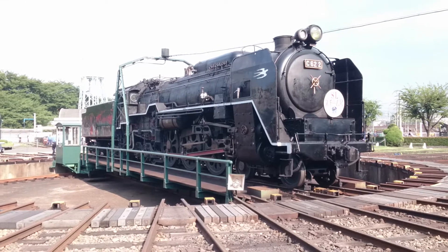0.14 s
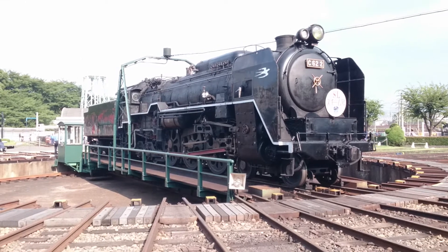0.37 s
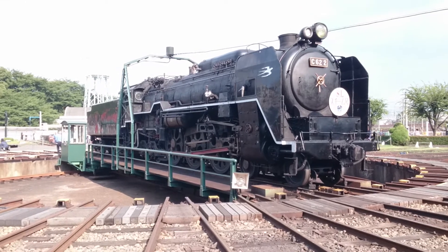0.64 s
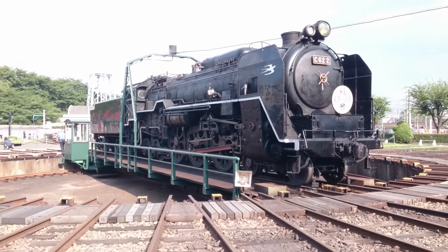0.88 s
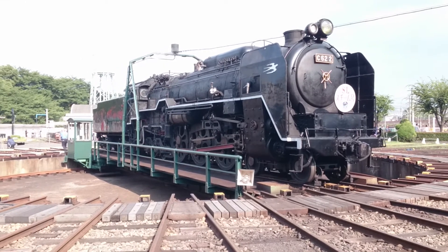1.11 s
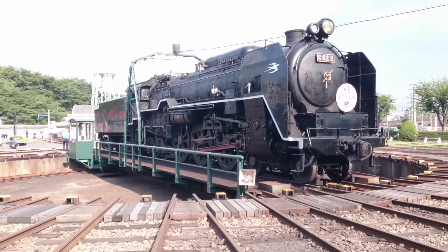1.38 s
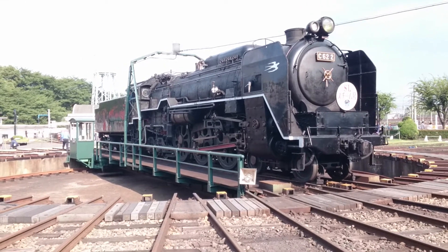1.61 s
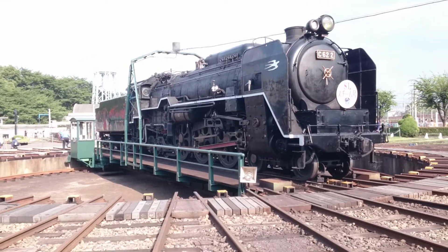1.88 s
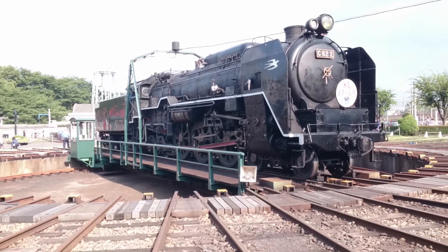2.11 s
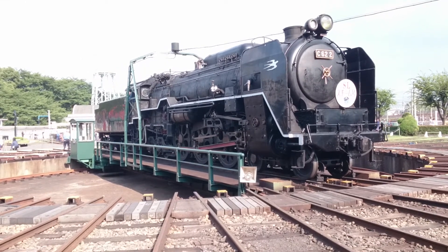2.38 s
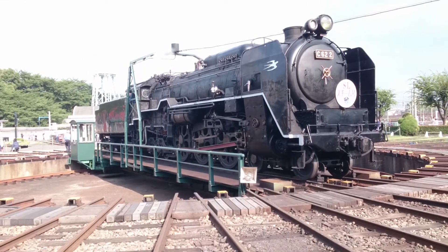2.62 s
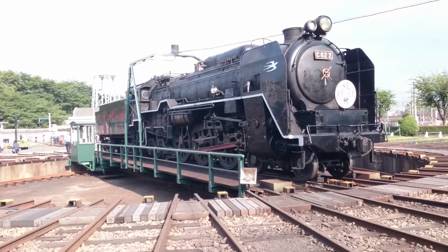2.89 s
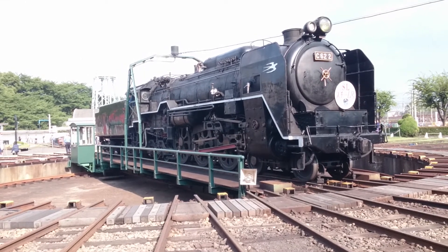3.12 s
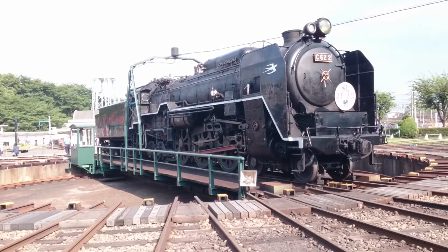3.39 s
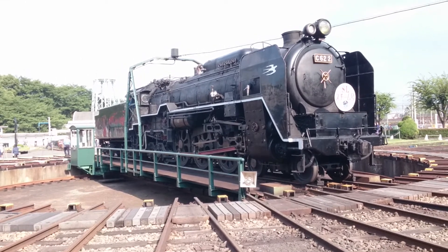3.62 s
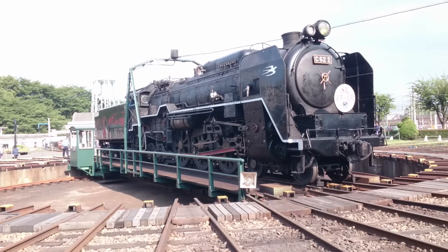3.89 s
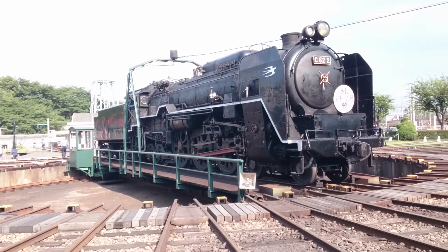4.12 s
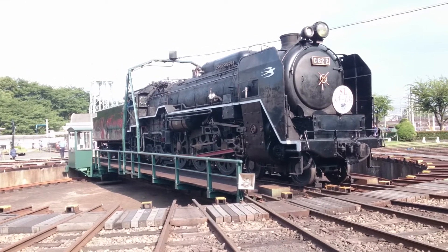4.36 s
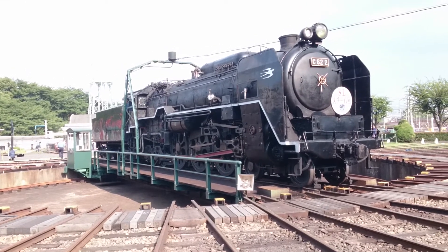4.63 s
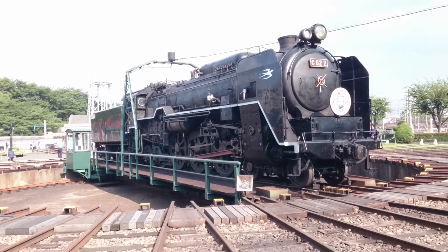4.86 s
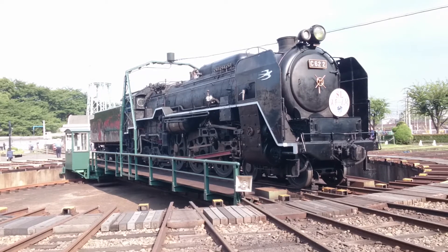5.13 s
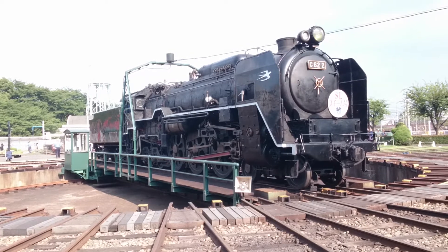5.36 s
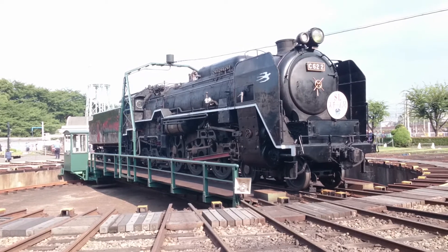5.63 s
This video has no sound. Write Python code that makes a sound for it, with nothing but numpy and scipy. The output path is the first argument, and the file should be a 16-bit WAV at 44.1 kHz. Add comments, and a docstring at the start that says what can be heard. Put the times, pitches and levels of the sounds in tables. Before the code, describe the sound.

Soft lumpy rumble and faint steam leakage come first, outdoors. A sudden blast of steam becomes a short whistle of several clashing notes, with a high squeal inside it, then an echo dying away. Next come sharp metallic knocks with dull thuds and a loud, wide steam jet that swells quickly, stays nearly level and turns brighter until the end. Single microphone, centred mono sound.

```python
"""A thin steam hiss over a low, uneven rumble in an open yard: a steam locomotive stands leaking a little.
Its chime whistle blows briefly, breathy, five chambers speaking in turn, and echoes off the sheds;
then a valve clanks open and steam roars out while the rumble fades away under it. One microphone.
Steam and rumble are shaped noise in bands, the chambers wavering sines, the metal struck resonators."""
import sys
import numpy as np
from scipy import signal
from scipy.fft import rfft, irfft, next_fast_len
from scipy.io import wavfile

SR = 44100
rng = np.random.default_rng(int(sys.argv[2]) if len(sys.argv) > 2 else 0)


def waveform_to_disk(signal):
    """Save audio, clipped to [-1, 1], as 16-bit WAV at the path in sys.argv[1]."""
    frames = np.transpose(np.atleast_2d(signal))
    scaled = np.clip(frames, -1, 1) * 32767
    samples = np.round(scaled).astype(np.int16)
    wavfile.write(sys.argv[1], SR, samples)


def elevation(decibels):
    """Turn decibel levels (scalar or array-like) into linear amplitude ratios."""
    levels = np.asarray(decibels, float)
    return 10 ** (levels / 20)


N = 253575
T = np.arange(N) / SR   # seconds
SIZE = next_fast_len(N)
BINS = np.fft.rfftfreq(SIZE, 1 / SR) + 1e-3   # Hz, kept off zero so it can be divided by

# Rumble level over time. Each row: time in seconds, then levels in dB of the bands
# 20-114 Hz, 112-273 Hz and 280-1200 Hz.
RUMBLE_LEVELS = [(0.0, -38.5, -47.5, -46), (2.05, -38.5, -48.5, -48.5), (2.25, -33, -49.5, -46),
                 (2.8, -43, -58, -46), (2.96, -40, -55, -41), (3.02, -39, -45, -37),
                 (3.4, -34.5, -40, -36.5), (3.8, -36, -41, -35), (4.1, -41, -50, -49.5),
                 (4.3, -54, -57, -53.5), (4.55, -56, -61, -57), (4.7, -64, -66, -59.5),
                 (5.2, -73, -75, -58), (5.75, -75, -72, -59)]
# Tone colour of the rumble. Each row: frequency in Hz, relative density in dB per Hz.
RUMBLE_COLOUR = [(18, -39), (30, -17), (43, 2.5), (65, 7), (116, -10.5), (141, -16.5), (196, -13.5),
                 (291, -23), (445, -21), (600, -24.5), (703, -21.5), (1180, -28), (1300, -20.5),
                 (1690, -58), (2860, -120)]
# Chance lumps of the low rumble, drawn as short low sine swells. Each row: centre in seconds,
# peak in dB, pitch in Hz.
RUMBLE_LUMPS = [(0.08, -30.5, 62.2), (0.42, -29, 70), (0.73, -34, 55.3), (0.9, -26.5, 60), (1.06, -30, 56),
                (1.12, -30, 62), (1.33, -30, 66), (1.79, -29, 59.7), (2.0, -30, 61.6), (2.2, -27, 60.6),
                (3.32, -30, 64.1)]
LUMP_S = 0.019   # spread of the bell-shaped swell

# Resonances of the leaking joints. Each row: frequency in Hz, width in Hz, relative level in dB.
LEAK_RESONANCES = [(1370, 180, -3), (2280, 29, -9), (2590, 220, -14), (3155, 200, -14), (3990, 120, -14.5),
                   (4730, 37, -5), (5860, 51, -1), (7500, 37, -17), (9050, 120, -13), (11660, 360, -23),
                   (12700, 300, -23), (15600, 170, -16)]
# Tone colour of the leak. Each row: frequency in Hz, relative density in dB per Hz.
LEAK_HISS_COLOUR = [(590, -40), (1000, -12), (1370, -6), (1480, -10.5), (2190, -5.5), (3560, -19.5),
                    (5790, -3.5), (7810, -16.5), (9840, -8.5), (11200, -16.5), (15800, -22.5)]
LEAK_DB, LEAK_LOW_DB = -39, -48.5   # above and below about 3.5 kHz

# Short swells of noise, mostly steam. Each row: start, peak and end in seconds, frequency in Hz,
# width in Hz, level in dB.
NOISE_SWELLS = [(0.22, 0.32, 0.43, 445, 34, -46), (0.57, 0.83, 1.5, 380, 130, -49),
                (0.68, 0.83, 1.13, 1400, 2800, -43.5), (2.115, 2.155, 2.18, 1880, 170, -32.5),
                (2.164, 2.2, 2.22, 1960, 120, -26.5), (2.15, 2.2, 2.3, 4200, 150, -24),
                (2.128, 2.15, 2.4, 5880, 150, -32.5), (3.47, 3.51, 3.535, 2000, 6400, -28.5),
                (3.505, 3.516, 3.545, 6100, 8000, -23)]

# Pitch of the five whistle chambers, climbing in four of them as the bell warms. Each row: speaking time
# in seconds, first pitch in Hz, time it is steady in seconds, steady pitch in Hz.
CHAMBER_PITCH = [(2.45, 318, 2.53, 340), (2.26, 582, 3.4, 600), (2.25, 652, 2.78, 704),
                 (2.3, 752, 2.59, 826), (2.05, 400, 2.5, 400)]
# Loudness of the five chambers. Each row: first level in dB, turning time in seconds,
# level there in dB, settled level in dB.
CHAMBER_LEVEL = [(-33, 2.6, -21, -22.5), (-33, 2.5, -35, -55), (-23.5, 2.53, -23, -38),
                 (-28, 2.47, -21, -24), (-48, 2.5, -37, -38)]
# Moments when the high chambers falter together. Each row: time in seconds, loss in dB.
CHAMBER_FALTERS = [(2.41, 6), (2.63, 8), (2.84, 14)]
FALTER_S, STEP_UP = 0.014, 0.023   # the first falter also lifts their pitch by this fraction
SPEAK_S, SETTLE_S = 0.026, 0.033   # fade-in before speaking; time constant of the settling
WHISTLE_SHUT_S, SHUT_FADE_S = 2.877, 0.015

# Echo off the sheds. Each row: dB relative to the blast, dB thinner at first, seconds to gather,
# dying away in dB per second.
ECHO_LOW_NOTE, ECHO_HIGH_NOTES = (-8, 5, .2, 30), (-12, 14, .14, 85)
ECHO_BASS, ECHO_LOW = (-3, 9, .12, 15), (-3, 8, .1, 42)
ECHO_MID, ECHO_TOP = (-7, 11, .1, 62), (-11, 9, .1, 62)
ECHO_SQUEAL = (-14, 8, .1, 70)

# Steam through the whistle. Each row: time in seconds, reference level in dB, then dB relative to it
# of the bands 1280-3260 Hz and 7900-17000 Hz.
BREATH_LEVELS = [(2.08, -63, -6, -3), (2.15, -33, -7, -1.5), (2.21, -17, -2.5, 1),
                 (2.26, -13.5, -10.5, -3.5), (2.38, -16, -8.5, -8.5), (2.6, -18, -10.5, -5.5),
                 (2.72, -19, -9.5, -1.5), (2.865, -17.5, -14.5, -6.5)]
# Resonances of the whistle's mouth. Each row: frequency in Hz, width in Hz, relative level in dB.
MOUTH_RESONANCES = [(1350, 280, -11), (1810, 70, -9), (2260, 100, -6), (2860, 80, -11), (3180, 130, -8),
                    (3510, 110, -10), (3830, 90, -9), (4250, 150, -9), (4550, 200, -8), (5160, 150, -5),
                    (6000, 170, 0), (6500, 260, -6), (6980, 150, -8), (7900, 300, -9), (8720, 150, -11),
                    (9340, 170, -4), (10200, 300, -9), (11050, 300, -8), (11500, 200, -10),
                    (12250, 450, -13), (13050, 200, -17), (13550, 300, -16), (14200, 400, -15),
                    (15400, 500, -14)]
# Tone colour of the breath. Each row: frequency in Hz, relative density in dB per Hz.
MOUTH_COLOUR = [(300, 0), (550, 3.5), (950, 6.5), (1150, -14), (1500, 1), (4000, -7.5), (7500, -5),
                (10000, -2), (12800, -15), (15600, -14)]
BREATH_BASS_DB, BREATH_MID_DB = -18.5, -4.0   # relative to the reference level
SQUEAL_HZ, SQUEAL_WIDTH_HZ = 6445, 130
SQUEAL_FROM_DB, SQUEAL_TO_DB, SQUEAL_GROWS_S = -11, -0.5, (2.41, 2.59)   # relative to the reference level

# The released steam. Each row: time in seconds, level in dB of 3190-7980 Hz, then dB relative to it
# of the bands 530-3400 Hz and 8470-15200 Hz.
RELEASE_LEVELS = [(3.55, -30.5, -7.5, -6.5), (3.69, -24.5, -9.5, -6.5), (3.77, -24.5, -8, -4.5),
                  (3.86, -19, -10.5, -6), (4.01, -16.5, -12.5, -3), (4.56, -18.5, -14.5, 0),
                  (5.2, -19.5, -18, 0), (5.33, -19, -18.5, 4), (5.6, -19, -17, 3), (5.75, -17, -17.5, 5.5)]
# Resonances of the open jet. Each row: frequency in Hz, width in Hz, relative level in dB.
JET_RESONANCES = [(1670, 350, -19), (2317, 230, -13.5), (3355, 120, -12.5), (4280, 240, -8),
                  (5700, 420, -2.5), (6440, 390, -3.5), (8710, 190, -2), (9780, 260, 0), (10720, 120, 0)]
# Tone colour of the jet. Each row: frequency in Hz, relative density in dB per Hz.
JET_COLOUR = [(400, -41), (700, -31), (1000, -20.5), (1300, -26.5), (2000, -19.5), (3700, -14.5), (5650, 1),
              (7300, -5), (9800, -3), (12000, -4.5), (13400, -10), (14400, -5.5), (15600, -8.5)]

# Metal knocks of the valve. Each row: time in seconds, relative strength in dB.
VALVE_KNOCKS = [(3.513, 1), (3.516, 1), (3.5188, -11), (3.5225, -21), (3.529, -12), (3.537, -22),
                (3.588, -15)]
# Ringing modes of the valve body. Each row: frequency in Hz, relative level in dB,
# time to fall 60 dB in seconds.
VALVE_MODES = [(1500, -16, 0.035), (5250, -12, 0.05), (6000, -24, 0.036), (6460, -2.5, 0.053),
               (6950, -2, 0.02), (6940, -4, 0.023), (7030, -5, 0.053), (9440, -14, 0.043),
               (12300, -14, 0.033), (14000, -32.5, 0.032), (15200, -23, 0.034)]
# Dull thuds of the linkage. Each row: time in seconds, level in dB, pitch in Hz.
LINKAGE_THUDS = [(3.505, -15, 1670), (3.503, -23, 920), (3.49, -23, 150), (3.516, -23, 138),
                 (3.517, -27, 258), (3.66, -24, 910), (3.77, -25.5, 139), (3.786, -23, 340),
                 (3.795, -20.5, 790)]


def rms_one(x):
    """Scale to unit rms."""
    return x / np.sqrt(np.mean(x ** 2) + 1e-20)


def in_time(rows):
    """Draw a table's columns as automation curves, one value a sample."""
    s, *columns = np.transpose(rows)
    return [np.interp(T, s, c) for c in columns]


def sounding(rows, fade_s):
    """Gate: open over the table's span, with short ramps outside it."""
    first, last = rows[0][0], rows[-1][0]
    return np.interp(T, [first - fade_s, first, last, last + fade_s], [0, 1, 1, 0])


def drift(rate):
    """Slow chance: noise through a double one-pole low-pass at rate (Hz), with unit rms."""
    step = 40   # samples between drawn values
    r = np.exp(-2 * np.pi * rate * step / SR)
    chance = rng.standard_normal(N // step + 2002)
    slow = signal.lfilter([1], [1, -2 * r, r * r], chance)[2000:]
    return np.interp(np.arange(N) / step, np.arange(len(slow)), rms_one(slow))


def ring(clicks, hz, t60):
    """Two-pole resonator: a unit click starts a sine of height 1 that falls 60 dB in t60 seconds."""
    r, w = elevation(-60 / (t60 * SR)), 2 * np.pi * hz / SR
    return signal.lfilter([0, np.sin(w)], [1, -2 * r * np.cos(w), r * r], clicks + 1e-18)


def turbulence(colour, peaks, broad_db):
    """Spectrum of noise: a broad colour with the resonances of the opening standing on it."""
    hz, level_db = np.transpose(colour)
    power = elevation(np.interp(np.log(BINS), np.log(hz), level_db) + broad_db) ** 2
    for centre_hz, width_hz, peak_db in peaks:
        detune = 2 * (BINS - centre_hz) / width_hz
        power = power + elevation(peak_db) ** 2 / (1 + detune ** 2) ** 2
    return rfft(rng.standard_normal(SIZE)) * np.sqrt(power)


def band(noise, low, high, level_db, flutter_db, rate):
    """One part of the noise (Hz limits) set to its level, fluttering at rate (Hz)."""
    edge = 1 / np.sqrt((1 + (low / BINS) ** 16) * (1 + (BINS / high) ** 16))
    part = rms_one(irfft(noise * edge, SIZE)[:N])
    return part * elevation(level_db + flutter_db * drift(rate))


def narrow_noise(hz, width_hz):
    """Noise round a single resonance, over a very faint bed."""
    return turbulence([(1000, -90), (9000, -90)], [(hz, width_hz, 0)], broad_db=0)


def yard():
    """Rumble of the boiler and distant traffic: noise in three bands, lumpy at the bottom."""
    rumble_db, low_db, mid_db = in_time(RUMBLE_LEVELS)
    lumps = np.zeros(N)
    for s, peak_db, hz in RUMBLE_LUMPS:
        swell = np.exp(-.5 * ((T - s) / LUMP_S) ** 2)
        lumps += elevation(peak_db) * swell * np.sin(2 * np.pi * (hz * T + rng.random()))
    noise = turbulence(RUMBLE_COLOUR, [(58.6, 7.5, 3)], broad_db=-8.5)   # the rumble drones near one pitch
    return (lumps + band(noise, 20, 114, rumble_db, flutter_db=1.0, rate=6.6)
            + band(noise, 112.0, 273, low_db, flutter_db=1.5, rate=23.0)
            + band(noise, 280, 1200, mid_db, flutter_db=1.0, rate=8.0))


def leak():
    """Thin hiss from the joints: resonant noise at a constant level, fluttering slightly."""
    noise = turbulence(LEAK_HISS_COLOUR, LEAK_RESONANCES, broad_db=-4.0)
    return (band(noise, 3390, 17000, LEAK_DB, flutter_db=1.2, rate=2.1)
            + band(noise, 1200, 3720, LEAK_LOW_DB, flutter_db=1.0, rate=5.9))


def spurts():
    """Brief swells of noise round one resonance: narrow ones pipe or hum faintly, wide ones puff."""
    out = np.zeros(N)
    for start, peak, end, hz, width_hz, level_db in NOISE_SWELLS:
        swell = np.interp(T, [start, peak, end], [0, 1, 0])
        out += swell * band(narrow_noise(hz, width_hz), 250, 16000, level_db, flutter_db=.9, rate=30.0)
    return out


def shut_with_echo(echo):
    """Two gains: the direct sound ends when the whistle shuts, its echo gathers and dies."""
    under_db, thin_db, gather_s, dies = echo
    since = T - WHISTLE_SHUT_S
    direct = np.clip(-since / SHUT_FADE_S, 0, 1)
    thinner_db = thin_db * np.clip(1 - since / gather_s, 0, 1)
    died_db = dies * np.maximum(since - gather_s, 0)
    return direct, (1 - direct) * elevation(under_db - thinner_db - died_db)


def wandering(phase, rate_a, rate_b):
    """A tone smeared round its pitch: sine and cosine drift in height independently."""
    return drift(rate_a) * np.sin(phase) + drift(rate_b) * np.cos(phase)


def chamber(number, echo, waver, flutter_db, breathy_db, blur_db, falters=True):
    """An air column: a wavering tone with a breathy skirt around it."""
    speaks, first_hz, steady, steady_hz = CHAMBER_PITCH[number]
    first_db, turn, turn_db, settled_db = CHAMBER_LEVEL[number]
    hz = first_hz + (steady_hz - first_hz) * np.minimum((T - speaks) / (steady - speaks), 1)
    level_db = np.interp(T, [speaks, turn], [first_db, turn_db])
    settled = 1 - np.exp(-np.maximum(T - turn, 0) / SETTLE_S)
    level_db = level_db + (settled_db - turn_db) * settled
    if falters:
        before = np.clip((CHAMBER_FALTERS[0][0] - T) / FALTER_S, -30, 30)
        hz = hz * (1 + STEP_UP / (1 + np.exp(before)))
        for s, loss_db in CHAMBER_FALTERS:
            level_db = level_db - loss_db * np.exp(-.5 * ((T - s) / FALTER_S) ** 2)
    phase = 2 * np.pi * np.cumsum(hz * (1 + waver * drift(22.6))) / SR
    tone = np.sin(phase) * elevation(flutter_db * drift(22.0))
    clear = tone + elevation(breathy_db) * wandering(phase, 40.0, 49.0)
    blurred = clear + elevation(blur_db) * wandering(phase, 18.0, 19.0)   # echoes from many walls blur the tone
    direct, late = shut_with_echo(echo)
    speak = np.clip((T - speaks) / SPEAK_S + 1, 0, 1) ** 2
    return np.sqrt(2) * elevation(level_db) * speak * (direct * clear + late * blurred)


def chime():
    """The five chambers of the whistle together; three high ones falter as one."""
    return (chamber(0, ECHO_LOW_NOTE, waver=0.0019, flutter_db=1.3, breathy_db=-42, blur_db=-7.5,
                    falters=False)
            + chamber(1, ECHO_HIGH_NOTES, waver=0.0037, flutter_db=2.5, breathy_db=-13, blur_db=-5)
            + chamber(2, ECHO_HIGH_NOTES, waver=0.0046, flutter_db=2.5, breathy_db=-10, blur_db=-3)
            + chamber(3, ECHO_HIGH_NOTES, waver=.004, flutter_db=1.8, breathy_db=-16, blur_db=-4.5)
            + chamber(4, ECHO_HIGH_NOTES, waver=0.0143, flutter_db=2.5, breathy_db=-3, blur_db=-2,
                      falters=False))


def whistle_breath():
    """Steam tearing over the lips of the whistle; a high squeal grows as it blows through."""
    level_db, low_db, top_db = in_time(BREATH_LEVELS)
    squeal_db = level_db + np.interp(T, SQUEAL_GROWS_S, [SQUEAL_FROM_DB, SQUEAL_TO_DB])
    squeal = band(narrow_noise(SQUEAL_HZ, SQUEAL_WIDTH_HZ), 3500, 8000, squeal_db, flutter_db=0.5, rate=36.0)
    out = squeal * sum(shut_with_echo(ECHO_SQUEAL))
    near = turbulence(MOUTH_COLOUR, MOUTH_RESONANCES, broad_db=-12.0)
    far = turbulence(MOUTH_COLOUR, MOUTH_RESONANCES, broad_db=-7.5)   # the echo smooths the resonances over
    for k, noise in enumerate((near, far)):   # k picks the direct gain, then the echo gain
        bass = band(noise, 310, 1170, level_db + BREATH_BASS_DB, flutter_db=2.5, rate=10.0)
        low = band(noise, 1280, 3260, level_db + low_db, flutter_db=0.7, rate=7.3)
        mid = band(noise, 3470, 7140, level_db + BREATH_MID_DB, flutter_db=0.85, rate=12.0)
        top = band(noise, 7900, 17000, level_db + top_db, flutter_db=0.5, rate=12.0)
        out = out + bass * shut_with_echo(ECHO_BASS)[k] + low * shut_with_echo(ECHO_LOW)[k]
        out = out + mid * shut_with_echo(ECHO_MID)[k] + top * shut_with_echo(ECHO_TOP)[k]
    return out * np.clip((T - BREATH_LEVELS[0][0]) / 0.054 + 1, 0, 1)   # 54 ms fade-in


def release():
    """The wide open jet: resonant noise in three bands, swelling quickly, then growing brighter
    at nearly steady level."""
    level_db, low_db, top_db = in_time(RELEASE_LEVELS)
    noise = turbulence(JET_COLOUR, JET_RESONANCES, broad_db=-2.0)
    level_db = level_db + 0.26 * drift(7.4)   # the whole jet surges together
    out = (band(noise, 530, 3400, level_db + low_db, flutter_db=0.04, rate=9.8)
           + band(noise, 3190, 7980, level_db, flutter_db=0.85, rate=21.0)
           + band(noise, 8470, 15200, level_db + top_db, flutter_db=0.86, rate=26.0))
    return out * sounding(RELEASE_LEVELS, 0.098)


def valve():
    """Metal knocks ring the modes of the valve body; the linkage adds short dull thuds."""
    out = np.zeros(N)
    at = [round(s * SR) for s, strength_db in VALVE_KNOCKS]
    strength_db = np.array(VALVE_KNOCKS)[:, 1]
    spread_db = rng.normal(0, 2.5, (len(at), len(VALVE_MODES)))   # each knock excites the modes differently
    for k, (hz, level_db, t60) in enumerate(VALVE_MODES):
        clicks = np.zeros(N)
        clicks[at] = elevation(strength_db + level_db - 7.5 + spread_db[:, k])
        blows = ring(clicks, hz, t60)
        out += ring(blows, hz, 0.0044) * 2800.0 / SR   # the blow lasts about a millisecond
    for s, level_db, hz in LINKAGE_THUDS:
        click = np.zeros(N)
        click[round(s * SR)] = elevation(level_db)
        out += ring(click, hz, 25 / hz)   # down 60 dB after 25 cycles
    return out


def scene():
    """Everything reaches one microphone, heard alike on both channels."""
    mono = yard() + leak() + spurts() + chime() + whistle_breath() + release() + valve()
    return np.array([mono, mono])


def low_pass(x):
    """Removes everything above the highest recorded frequency."""
    return signal.sosfilt(signal.butter(12, 16510, fs=SR, output="sos"), x)


def record(dry):
    """Peaks are rounded softly, then the extremes of the range are cut."""
    held = 1.4 * np.tanh(dry / 1.4)
    low_cut = signal.butter(4, 47.0, "high", fs=SR, output="sos")
    high_cut = signal.ellip(12, .5, 60, 15720, fs=SR, output="sos")   # steep
    held = signal.sosfilt(low_cut, held)
    held = signal.sosfilt(high_cut, held)
    return low_pass(held)


dry = scene()
out = record(dry)
waveform_to_disk(out)
```